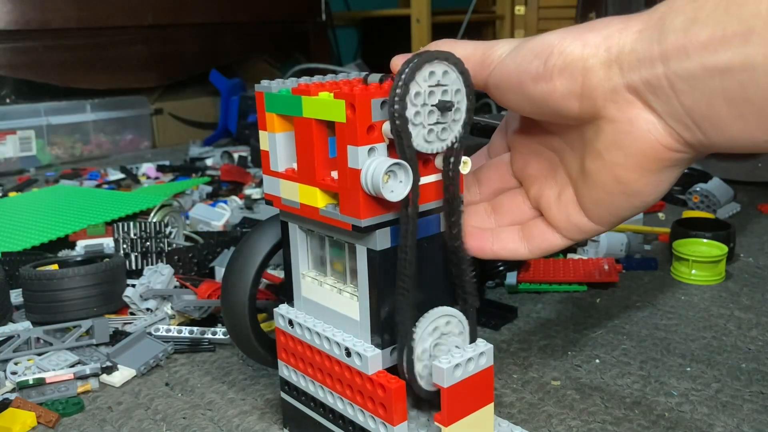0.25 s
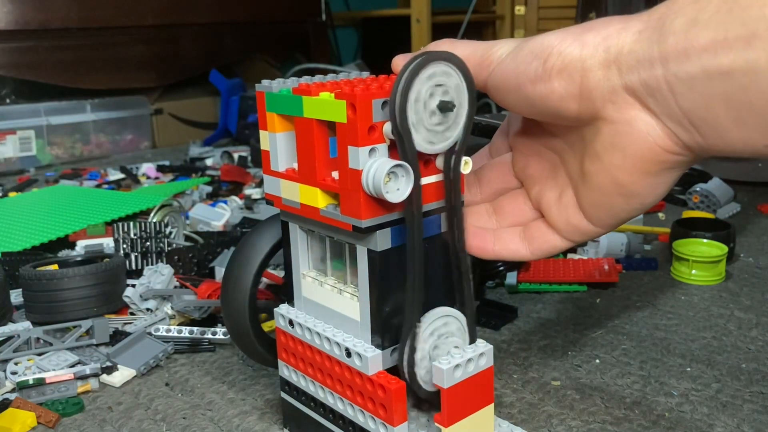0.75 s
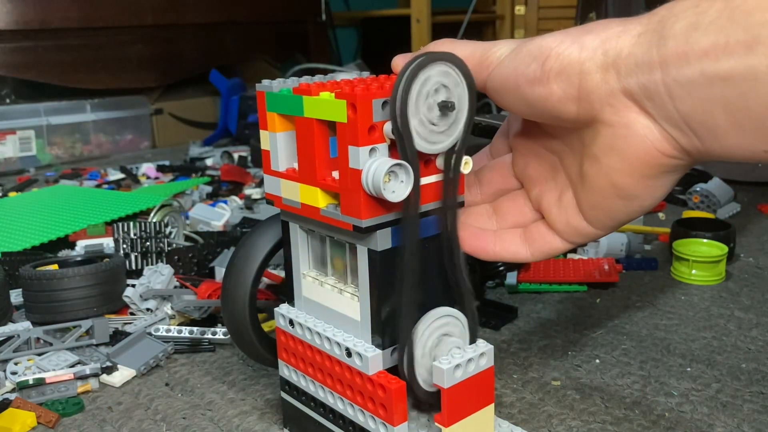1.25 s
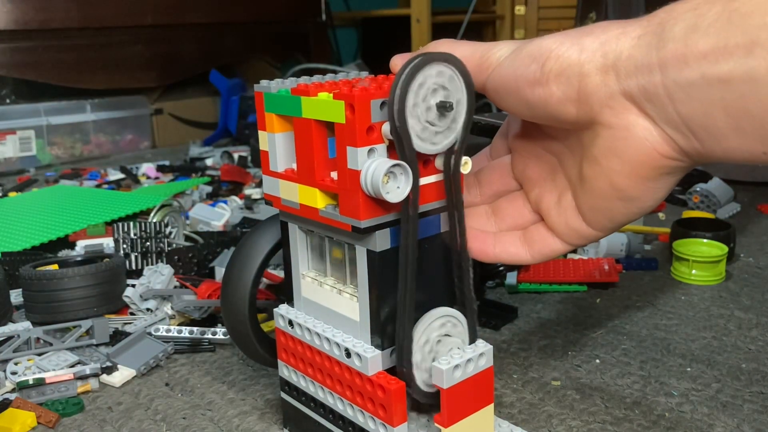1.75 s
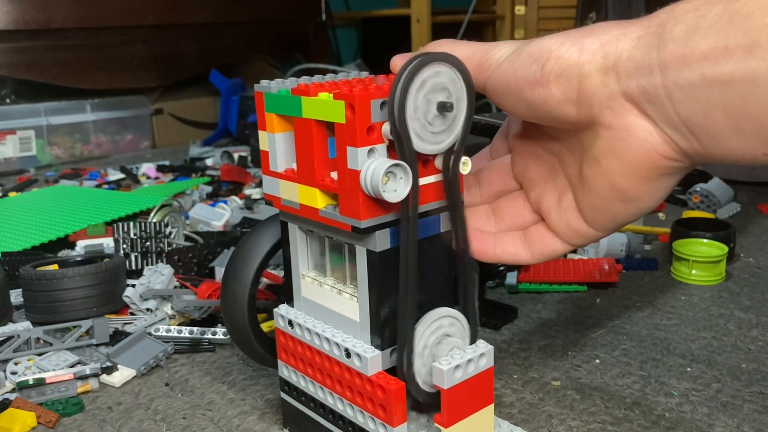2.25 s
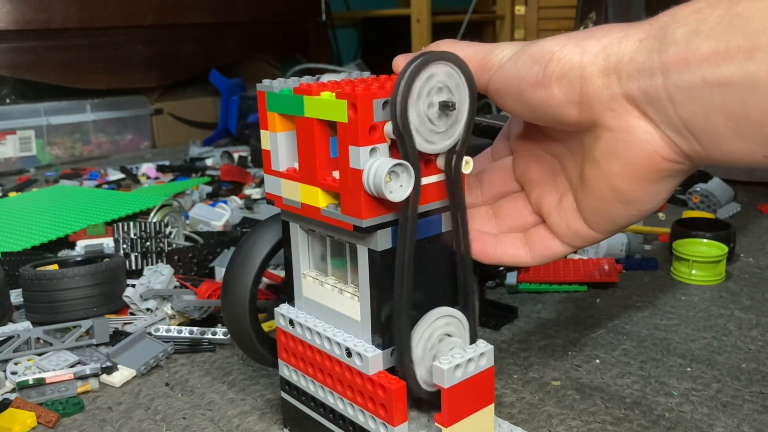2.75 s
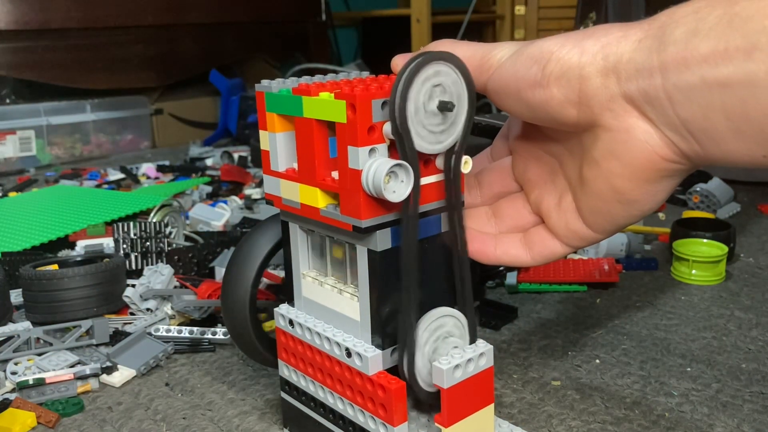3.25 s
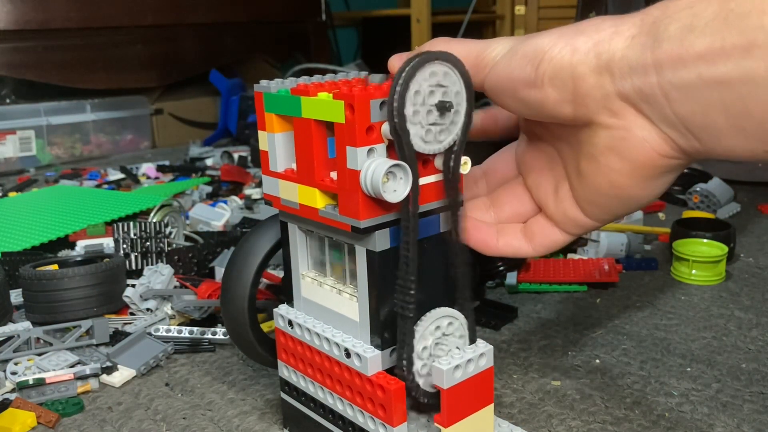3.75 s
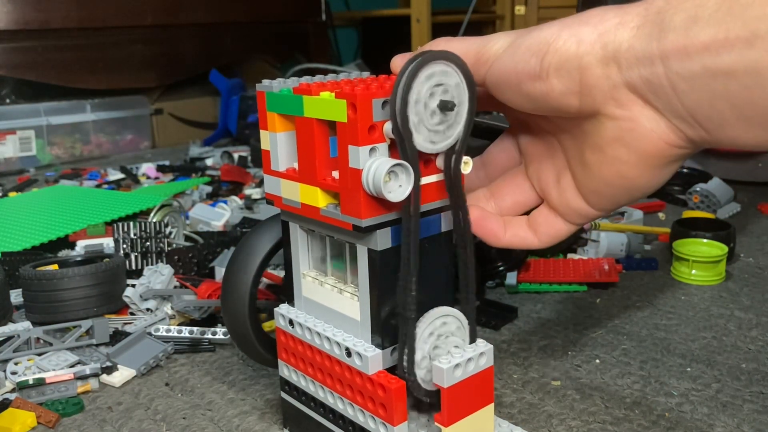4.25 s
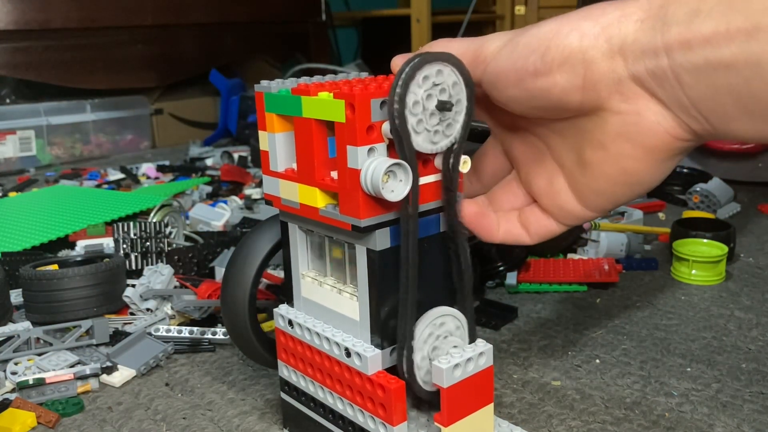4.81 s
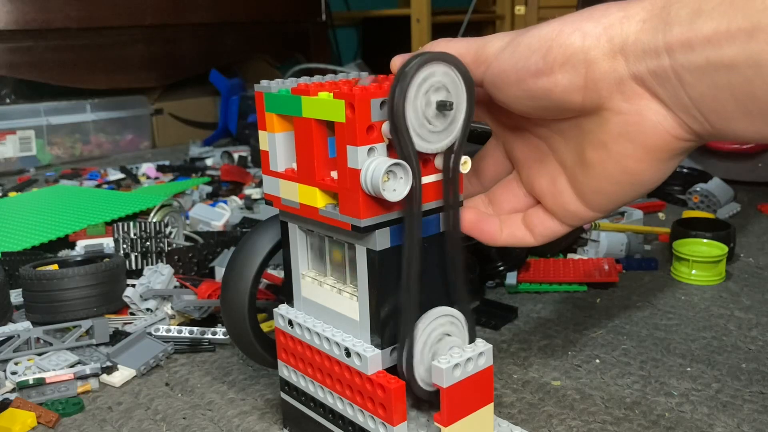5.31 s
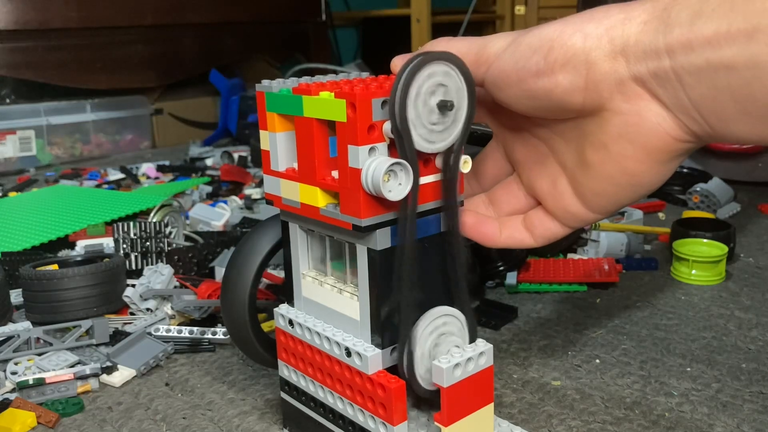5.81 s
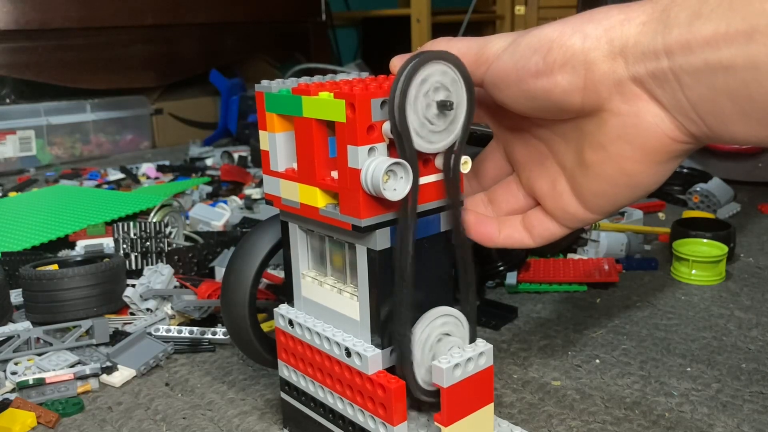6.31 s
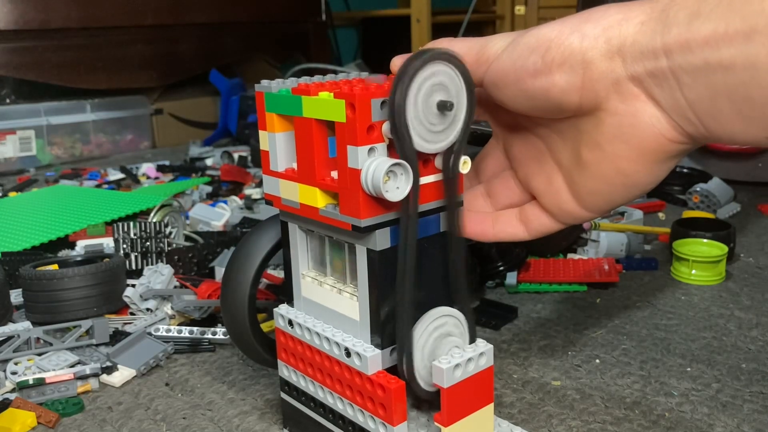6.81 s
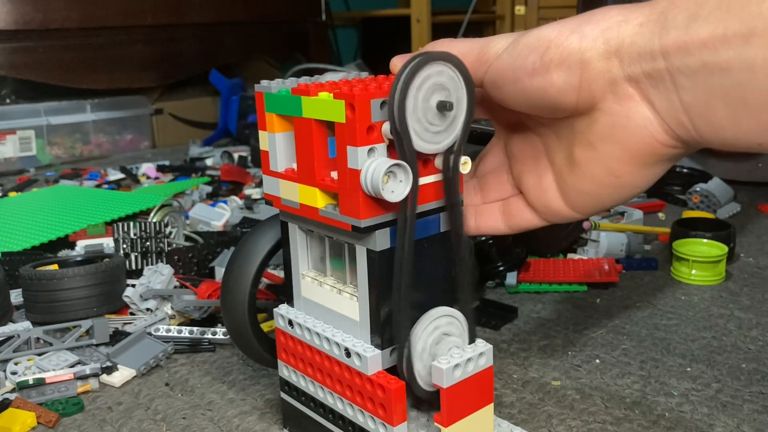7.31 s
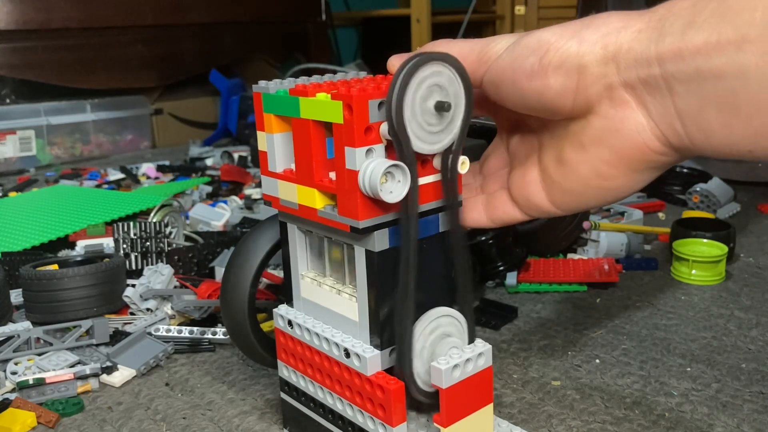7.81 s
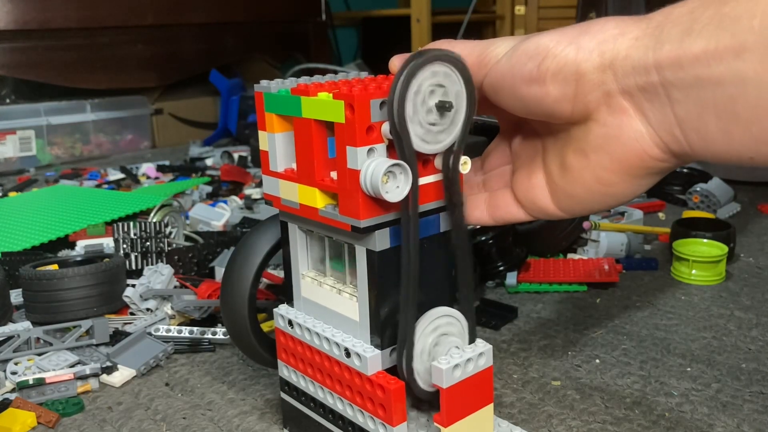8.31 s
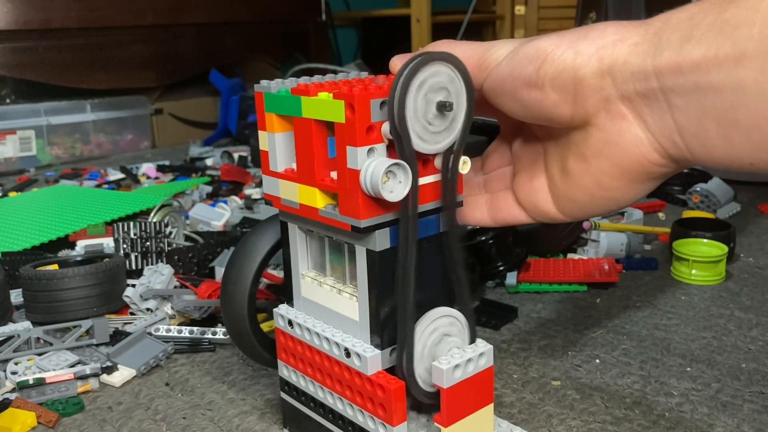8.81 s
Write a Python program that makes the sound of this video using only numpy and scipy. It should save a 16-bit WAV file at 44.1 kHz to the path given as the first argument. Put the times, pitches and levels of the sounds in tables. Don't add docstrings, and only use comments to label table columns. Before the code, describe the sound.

Rapid even thump-hiss-slap of a toy suction engine, close up, quickening sharply halfway, with a vacuum cleaner rushing and faintly whining behind.

```python
import sys
import numpy as np
from scipy import signal
from scipy.fft import rfft, irfft
from scipy.io import wavfile
from scipy.ndimage import uniform_filter1d

SR = 44100
rng = np.random.default_rng(int(sys.argv[2]) if len(sys.argv) > 2 else 0)


def to_wav(sig):
    pcm = np.clip(np.atleast_2d(sig), -1, 1) * 32767
    pcm = np.round(pcm).astype(np.int16)
    wavfile.write(sys.argv[1], SR, pcm.T)


def invert_db(level):
    return 10 ** (np.asarray(level, dtype=float) / 20)


N = 399546
TIME = np.arange(N) / SR
FREQ = np.fft.rfftfreq(N, 1 / SR)


def set_rms(x, db):
    return x * invert_db(db) / np.sqrt(np.mean(x ** 2))


def on_log(table, axis):
    rows = np.array(table)
    return np.interp(np.log(FREQ + 1), np.log(rows[:, 0]), rows[:, axis])


def peak(hz, width_hz):
    return 1 / (1 + (2 * (FREQ - hz) / width_hz) ** 2)


def biquad(x, hz, sharp, allpass=False):
    w = 2 * np.pi * hz / SR
    a, c = np.sin(w) / 2 / sharp, np.cos(w)
    top = [1 - a, -2 * c, 1 + a] if allpass else [(1 + c) / 2, -1 - c, (1 + c) / 2]
    return signal.lfilter(top, [1 + a, -2 * c, 1 - a], x)


def walk(rate):
    k = int(SR / rate)
    held = np.repeat(rng.standard_normal(N // k + 1), k)
    return 0.75 * uniform_filter1d(uniform_filter1d(held, k), k)[:N]


def add(out, s, x):
    i = int(s * SR)
    part = x[max(-i, 0):N - i]
    out[max(i, 0):max(i, 0) + len(part)] += part


# t/s, suction/0-1
THROTTLE = [
    (0, 0.18),
    (2, 0.05),
    (4.2, 0),
    (4.6, 0.17),
    (4.85, .8),
    (5.6, 0.95),
    (6.5, 1),
    (7.6, 0.99),
    (8.2, .5),
    (9.06, 0.1),
]


def by_suction(law, s):
    return law[0] + law[1] * np.interp(s, *np.transpose(THROTTLE))


# f/Hz, left lead/rad, likeness/0-1
PORTS = [(20, 0, .997), (200, .08, .985), (450, .3, .93), (750, .75, .85), (1000, .8, .55), (1600, .6, .7),
         (3000, 3.1, .45), (4300, 4.7, .3), (5600, 2.5, .3), (6300, .6, .8), (8000, 0, .75)]
# f/Hz, lead/half turns
TREBLE_LEAD = [(6850, 0), (9000, -1), (11300, -2), (13700, -3), (15700, -4)]


def right_of(x):
    turns = np.interp(FREQ, *np.transpose(TREBLE_LEAD)) * np.pi
    turns = turns - 0.1 * np.sin(2 * turns) / 2
    lead = np.where(FREQ < TREBLE_LEAD[0][0] - 500, on_log(PORTS, axis=1), turns)
    return irfft(rfft(x) * np.exp(-1j * lead), N)


def air(gain):
    like = np.clip(on_log(PORTS, axis=2), 0, 1)
    left = rfft(rng.standard_normal(N)) * gain
    other = rfft(rng.standard_normal(N)) * gain
    right = like * left + np.sqrt(1 - like ** 2) * other
    return np.array([irfft(left, N), right_of(irfft(right, N))])


# f/Hz, level/dB per Hz
RUSH = [(40, 0), (70, 3.5), (190, 5), (300, -4), (530, 2.5), (660, -1.5), (1000, -1.5), (2000, 0.5),
        (3200, -3.5), (5400, -4), (7000, -0.5), (12500, -1), (14000, -9.5), (16000, -1.5)]
# f/Hz, width/Hz, level above the rush/dB
HOUSING = [(999, 28, 8), (6780, 42, 6.5), (7040, 29, 10), (12900, 73, 13)]


def cleaner(gap):
    housing = sum(invert_db(db) ** 2 * peak(hz, w) for hz, w, db in HOUSING)
    colour = invert_db(on_log(RUSH, axis=1)) * np.sqrt(1 + housing)
    rush = set_rms(air(colour), -27) * invert_db(1.2 * walk(6))

    motor_lag_s, blades, mains_hum_hz = 0.45, 18, 120
    shaft_hz = by_suction((589.2, -2.2), TIME - motor_lag_s)
    shaft_hz = uniform_filter1d(shaft_hz, int(motor_lag_s * SR))
    load = uniform_filter1d(gap, int(0.09 * SR))
    turn = 2 * np.pi * np.cumsum(shaft_hz - 2.1 * (load - load.mean()) + 0.25 * walk(25)) / SR
    shaft_hum = invert_db(-44.5 + 0.98 * walk(12)) * np.sin(turn)
    whine = invert_db(-35 + 1.1 * walk(23)) * np.sin(blades * turn)
    mains_hum = invert_db(-40 + 1.5 * walk(5)) * np.sin(2 * np.pi * mains_hum_hz * TIME)
    tones = shaft_hum + whine + mains_hum
    return rush + np.array([tones, right_of(tones)])


def room(x, t60, db):
    t = np.arange(int(0.3 * SR)) / SR
    tail = rng.standard_normal((2, len(t))) / 1000 ** (t / t60) * np.clip(t / 0.0021 - 1, 0, 1)
    tail = signal.lfilter([1], [1, -0.3], tail)
    tail = tail * invert_db(db) / np.sqrt(np.sum(tail[0] ** 2))
    return signal.fftconvolve(x, tail, axes=1)[:, :N]


# t/s, speed/turns per s
CRANK_SPEED = [(0.0, 5.783), (0.52, 5.364), (1.74, 5.499), (2.63, 5.35), (2.82, 5.645), (3.02, 5.232),
               (3.83, 5.437), (4.5, 6.048), (4.67, 7.044), (5.0, 7.339), (5.37, 9.011), (5.94, 9.492),
               (6.64, 9.048), (6.85, 9.544), (7.1, 9.089), (7.45, 9.464), (8.19, 8.697), (9.06, 8.039)]


def strokes():
    speed = np.interp(TIME, *np.transpose(CRANK_SPEED))
    turns = -0.4512 + np.cumsum(speed) / SR
    whole = np.arange(round(turns[-1]) + 1)
    shuts = np.interp(whole, turns, TIME)
    share = 0.428 - 0.00526 * (np.interp(shuts, TIME, speed) - 5.4)
    speeding_up = uniform_filter1d(np.gradient(speed) * SR, int(0.32 * SR))
    gain = np.interp(shuts, TIME, speeding_up).clip(0)
    share = share - 0.0089 * gain
    late, soft, hard = rng.standard_normal((len(whole), 3)).T
    opens = np.interp(whole - share, turns, TIME) + 0.0014 * late
    thump_db = by_suction((0.2, 4), opens) + 1.4 * soft
    slap_db = by_suction((-2, 3.5), shuts) - 0.5 * gain + 0.7 * hard
    return np.transpose([opens, thump_db, shuts, slap_db])


def valve_gap(rows):
    gap = np.zeros(N)
    for opens, _, shuts, _ in rows:
        t = np.arange(int((shuts - opens + 0.0022) * SR)) / SR
        surge_db = -1.5 * t / t[-1] + 4.0 * np.exp((t - t[-1]) / 0.0015)
        slide = np.clip(t / 0.005, 0, 1)
        snap = np.clip((t[-1] - t) / 0.00021, 0, 1)
        add(gap, opens - 0.001, slide * snap * invert_db(surge_db))
    return gap


# f/Hz, width/Hz, level/dB
VALVE_HISS = [(535, 530, -1.5), (1950, 1010, 0), (1280, 1900, -8.5), (2710, 1300, -5), (4190, 810, 0.5),
              (4670, 430, -1), (8160, 7100, -2.5), (10260, 620, 3.5), (11650, 2900, -2), (14600, 2300, -8)]


def hiss(gap):
    colour = np.sqrt(sum(invert_db(db) ** 2 * peak(hz, w) ** 2 for hz, w, db in VALVE_HISS))
    flutter_db = 2.35 * walk(120)
    return set_rms(air(colour), -25.5) * gap * invert_db(by_suction((0, 2.5), TIME) + flutter_db)


def thumps(rows):
    push, t = np.zeros(N), np.arange(-400, 400) / SR
    for opens, open_db, shuts, shut_db in rows:
        add(push, opens + 0.0024 + t[0], -invert_db(open_db - 10.5) * np.exp(-0.5 * (t / 0.0018) ** 2))
        add(push, shuts + 0.0013 + t[0], invert_db(shut_db - 6.0) * np.exp(-0.5 * (t / 0.0015) ** 2))
    push = push + 0.14 * np.roll(push, int(0.02644 * SR))
    hose = biquad(push, hz=60, sharp=5.0)
    cylinder = biquad(hose, hz=197, sharp=1.9)
    return biquad(cylinder, hz=110, sharp=1.5, allpass=True)


# f/Hz, level/dB, t60/s, first swing/out 1 or in -1
BRICKS = [(404, -9.5, 0.017, 1), (569, -14, 0.018, -1), (731, -17, 0.037, -1), (782, -22, 0.037, -1),
          (832, -29, 0.051, 1), (1195, -27, 0.036, -1), (1286, -25.5, 0.0094, -1), (1730, -31, 0.034, 1),
          (2270, -19.5, .021, 1)]
# f/Hz, level/dB, t60/s
PLATE = [(2790, -16.5, 0.0071), (3455, -20.5, 0.012), (4290, -24.5, 0.012), (5050, -30, 0.016),
         (7240, -24, 0.01), (10370, -26.5, 0.022)]


def slaps(rows):
    out, t = np.zeros(N), np.arange(1800) / SR
    hz, db, t60, sign = np.transpose(BRICKS)[:, :, None]
    plate_hz, plate_db, plate_t60 = np.transpose(PLATE)[:, :, None]
    chance = rng.standard_normal((len(rows), 2, len(BRICKS), 1))
    scatter = rng.standard_normal((len(rows), 2, len(PLATE), 1))
    grit = rng.standard_normal((len(rows), 300))
    for row, (detune, uneven), (shift, spread), noise in zip(rows, chance, scatter, grit):
        _, _, shuts, shut_db = row
        hard_db = by_suction((1.5, 4.5), shuts)
        bite_db = (hz > 1000) * (hard_db - 4.5) * 0.41
        knock = np.sin(2 * np.pi * hz * (1 + 0.014 * detune) * t) / 1000 ** (t / t60)
        knock = np.sign(sign) * invert_db(db + bite_db + 1.57 * uneven) * knock
        ring = np.sin(2 * np.pi * plate_hz * (1 + 0.032 * shift) * t) / 1000 ** (t / plate_t60)
        ring = invert_db(plate_db + 2.2 * spread) * ring
        u = t[:len(noise)]
        chatter = 0.32 * noise * u / 0.00059 * np.exp(-u / 0.001)
        chatter[int(0.0009 * SR)] += 1
        rattle = np.convolve(ring.sum(axis=0), chatter / np.sqrt(np.sum(chatter ** 2)))
        add(out, shuts, invert_db(shut_db + 0.3) * knock.sum(axis=0))
        add(out, shuts - 0.0008, invert_db(shut_db + hard_db) * rattle)
    return out + invert_db(-24.5) * np.roll(out, int(0.013 * SR))


# f/Hz, left minus right level/dB
LEAN = [(20, 0), (200, 2.5), (700, -1), (1300, 5), (2400, 6), (4400, 7.5), (6300, -0.3)]


def engine_at_ports(rows, gap):
    blows = thumps(rows) + slaps(rows)
    engine = np.array([blows, right_of(blows)]) + hiss(gap)
    lean = invert_db(on_log(LEAN, axis=1) / 2)
    return irfft(rfft(engine) * np.array([lean, 1 / lean]), N)


def scene():
    rows = strokes()
    gap = valve_gap(rows)
    engine = engine_at_ports(rows, gap)
    bright = biquad(biquad(engine, 460, 0.66), 500, 0.69)
    return engine + room(bright, t60=0.18, db=-11.0) + cleaner(gap)


# from f/Hz, to f/Hz, level/dB
SUM_CUT = [(8300, 9620, -6), (8850, 9620, -20), (12900, 14400, -4.5), (13250, 14250, -20)]
# from f/Hz, to f/Hz, level/dB
DIFFERENCE_CUT = [(6300, 7500, -60), (10750, 11800, -6), (11050, 11650, -60), (15000, 15250, -5),
                  (15250, 22050, -90)]


def stronger_side(left, right):
    def cut(bands):
        return invert_db(sum(db * (FREQ > lo) * (FREQ < hi) for lo, hi, db in bands)) / 2

    total = cut(SUM_CUT) * (left + right)
    difference = cut(DIFFERENCE_CUT) * (left - right)
    return irfft(np.array([total + difference, total - difference]), N)


def band_limit(x):
    return signal.sosfilt(signal.butter(12, 17110, fs=SR, output="sos"), x)


def record(dry):
    ceiling, top_hz = 1.18, 15750
    rounded = ceiling * np.tanh(dry / ceiling)
    no_rumble = biquad(biquad(rounded, 24.5, 1.25), 25, 0.92)
    left, right = rfft(no_rumble) * (FREQ < top_hz)
    return band_limit(stronger_side(left, right))


dry = scene()
out = record(dry)
to_wav(out)
```